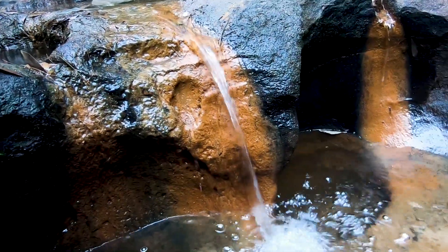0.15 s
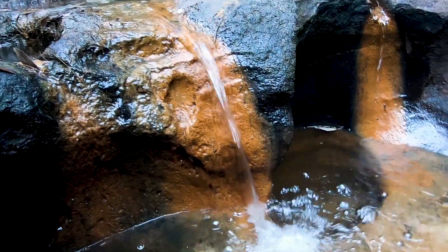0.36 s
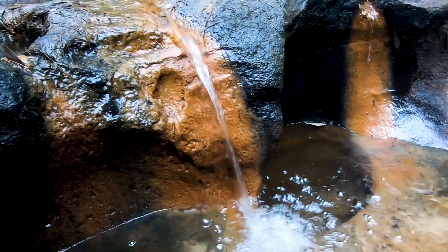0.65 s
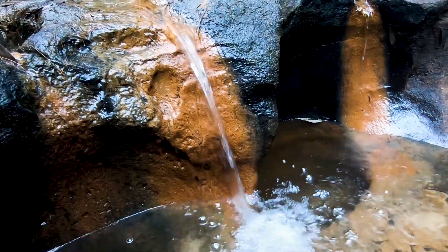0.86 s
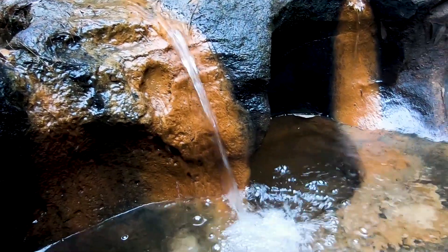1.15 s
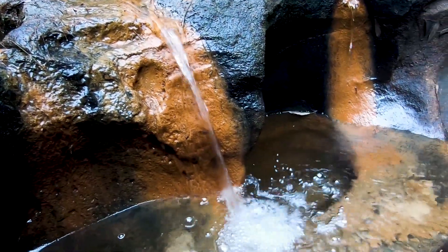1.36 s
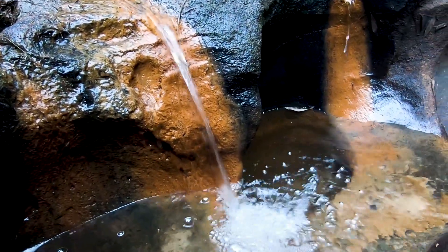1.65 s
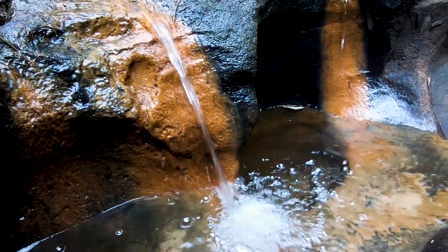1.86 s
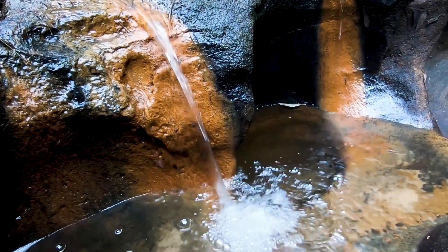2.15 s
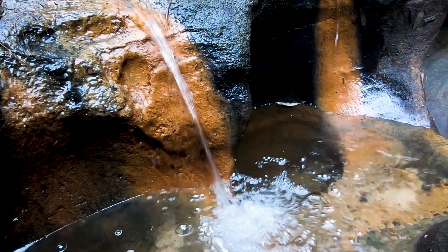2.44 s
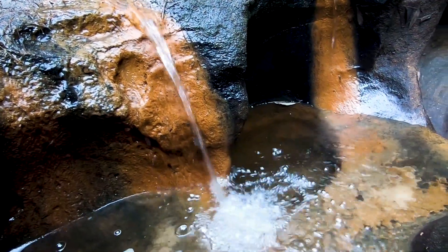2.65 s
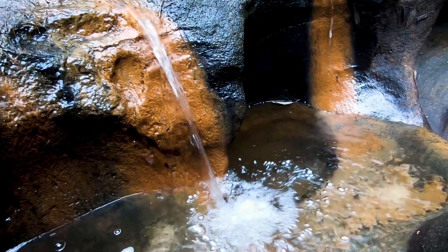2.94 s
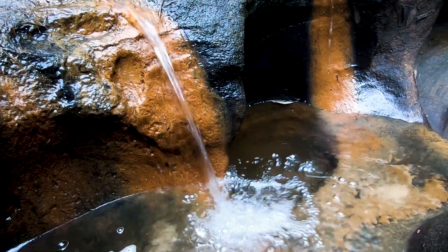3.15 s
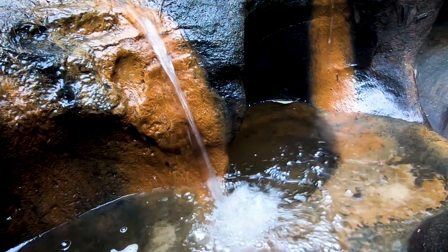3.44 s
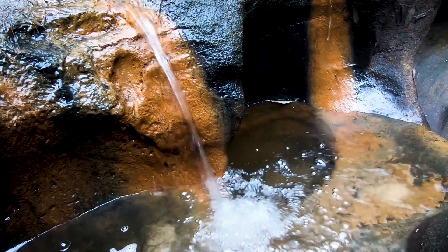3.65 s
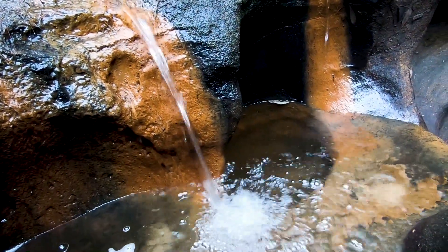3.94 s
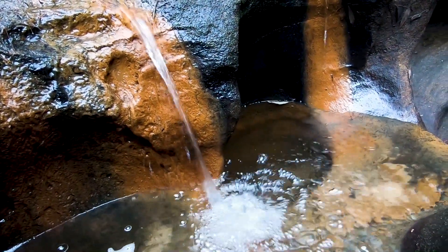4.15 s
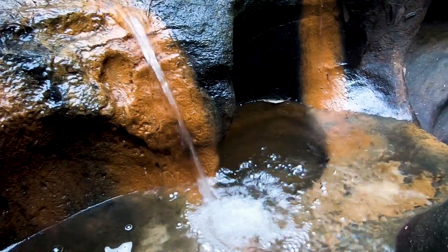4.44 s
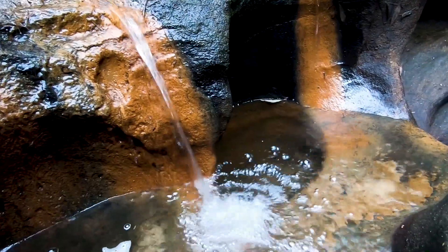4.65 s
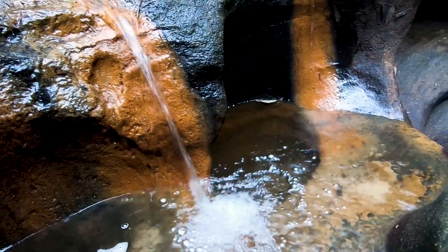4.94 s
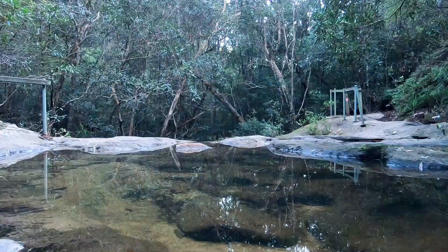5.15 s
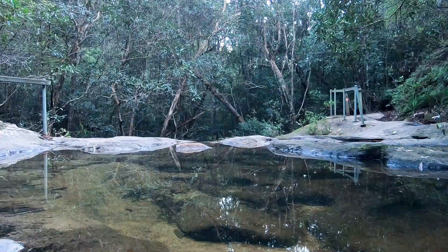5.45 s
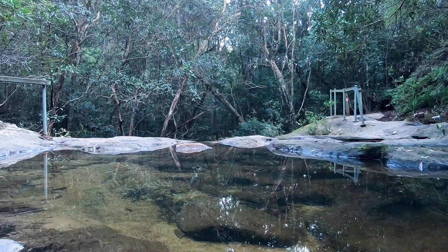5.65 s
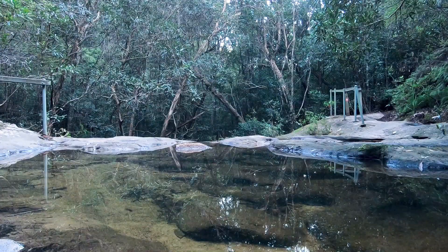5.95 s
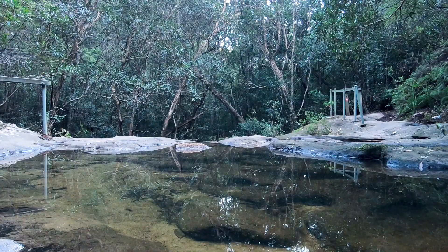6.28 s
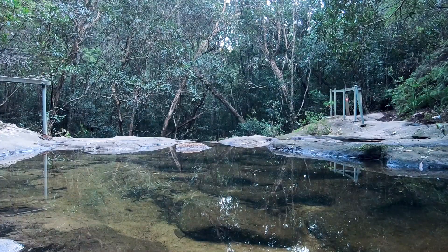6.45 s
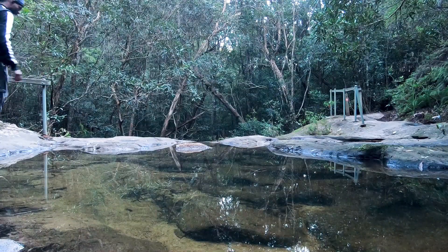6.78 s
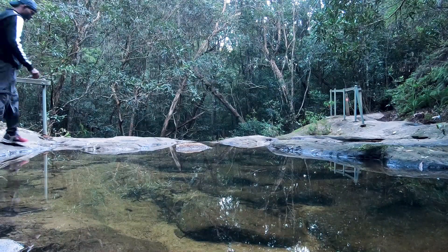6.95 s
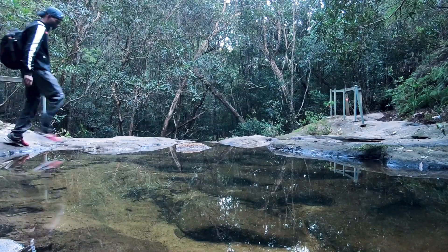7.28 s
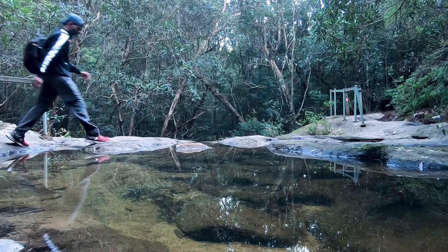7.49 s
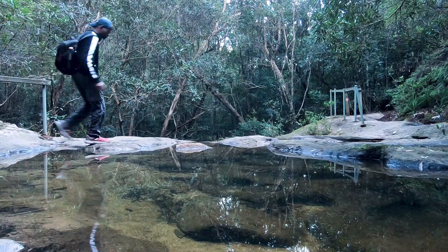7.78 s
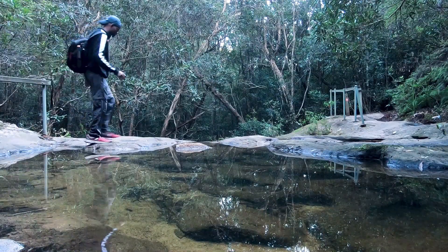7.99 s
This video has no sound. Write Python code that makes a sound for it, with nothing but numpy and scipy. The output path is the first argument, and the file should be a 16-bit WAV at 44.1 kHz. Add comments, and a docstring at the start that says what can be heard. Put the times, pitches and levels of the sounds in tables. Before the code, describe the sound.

A thin stream falls into a small rocky pool, heard close: hollow low gulps, quick bubbling, bright plinking drops and fine fizz. It starts nearly mono and slightly dull, then opens wider and clearer. After about five and a half seconds it drops away to smooth distant water hiss, faint low microphone throbs and a few soft footsteps on rock.

```python
"""A thin stream falls into a small pool in a hollow rock: gulps, spatter and fizz, ringing at fixed pitches.
Bubbles and splashes drive resonances of the hollow; air pockets and drops are short, swelling sines.
The stream fades out, leaving a still pond: far water is shaped noise, the microphone housing rings low as
filtered noise and sine throbs, and soft footsteps are bursts of filtered noise.
The left-right part is almost absent at first, then rises."""
import sys
import numpy as np
from scipy import signal
from scipy.fft import rfft, irfft, next_fast_len
from scipy.io import wavfile

SR = 44100
rng = np.random.default_rng(int(sys.argv[2]) if len(sys.argv) > 2 else 0)


def dump_mix(stems):
    """Bounce the given channels to the path in sys.argv[1] as a 16-bit WAV at rate SR."""
    frames = np.atleast_2d(stems).T  # one column per channel
    limited = np.clip(frames, -1, 1)  # hard clip at full scale
    pcm = np.round(limited * 32767).astype(np.int16)
    wavfile.write(sys.argv[1], SR, pcm)


def voltage_ratio(decibels):
    """Convert decibels (scalar or array-like) to amplitude ratios, 20 dB per decade."""
    exponent = np.asarray(decibels, float) / 20
    return 10 ** exponent


N = 358091
TIME_S = np.arange(N) / SR
POUR_ENDS_S = 5.4   # faint pockets and drops fall before this


def rms_one(x):
    """Scale to rms 1."""
    return x / np.sqrt(np.mean(x ** 2) + 1e-20)


def in_time(rows):
    """Columns of a curve, one value per sample."""
    s, *columns = np.transpose(rows)
    return [np.interp(TIME_S, s, column) for column in columns]


def coloured(x, points):
    """Give a flat signal a spectrum of (f/Hz, level/dB) points; rms 1."""
    size = next_fast_len(N)
    hz, level_db = np.transpose(points)
    log_hz = np.log(np.arange(size // 2 + 1) * SR / size + 1)
    gain = voltage_ratio(np.interp(log_hz, np.log(hz), level_db))
    return rms_one(irfft(rfft(x, size) * gain, size)[:N])


def drift(rate_hz):
    """Slow chance: noise through two one-pole low-passes at rate_hz; rms 1."""
    step = 40   # samples between slow values
    r = np.exp(-2 * np.pi * step * rate_hz / SR)
    noise = rng.standard_normal(N // step + 2002)
    slow = signal.lfilter([1], [1, -2 * r, r * r], noise)[2000:]   # skip the run-in
    return np.interp(np.arange(N) / step, np.arange(len(slow)), rms_one(slow))


def resonance(x, hz, width_hz):
    """A two-pole ring with gain 1 on top."""
    r = np.exp(-np.pi * width_hz / SR)
    poles = [1, -2 * r * np.cos(2 * np.pi * hz / SR), r * r]
    return signal.lfilter([(1 - r * r) / 2, 0, (r * r - 1) / 2], poles, x)


def bubbles(per_s, low_hz, high_hz, cycles, uneven_db, clump_db, clump_rate_hz, count):
    """Bubbles born in clumps, partly shared by all sizes, ring a few cycles at log-spaced pitches."""
    strength = voltage_ratio(uneven_db * np.minimum(rng.exponential(1, N), 4)) * rng.choice([-1, 1], N)
    shared = drift(clump_rate_hz)
    out = np.zeros(N)
    for hz in np.geomspace(low_hz, high_hz, count):
        clump = voltage_ratio(clump_db * (0.35 * shared + drift(clump_rate_hz)))
        born = rng.random(N) < per_s / count * clump / SR
        ring = resonance(strength * born + 1e-18, hz, 1.92 * hz / cycles)
        out += resonance(ring, hz, 0.75 * hz)
    return rms_one(out)


def hollow(x, modes, lag_s):
    """Parallel rings of the rock; their left-right part takes another path and arrives a little later."""
    mid, side = np.zeros(N), np.zeros(N)
    for k, (hz, width_hz, level_db, side_db) in enumerate(modes):
        ring = (-1) ** k * voltage_ratio(level_db) * resonance(x, hz, width_hz)   # alternate signs
        mid += ring
        side += voltage_ratio(side_db) * ring
    return np.array([mid, np.roll(side, round(lag_s * SR))])


def add_swelling_sine(out, s, hz, peak_db, t60, rise, attack_cycles):
    """A sine that swells and dies, its pitch climbing by twice the rise share over t60, as a bubble surfaces."""
    start = round(s * SR)
    t = np.arange(round(t60 * SR))[:N - start] / SR
    swell = (1 - np.exp(-t * hz / attack_cycles)) ** 2
    envelope = swell * voltage_ratio(peak_db - 60 * t / t60)
    out[start:start + len(t)] += envelope * np.sin(2 * np.pi * hz * t * (1 + rise * t / t60))


# Strength of the pour, before each layer's own gain:
# (t/s, deep gurgle level/dB, middle gurgle level/dB, spatter level/dB)
POUR_LEVELS = [(0.0, -45, -43.5, -41), (0.8, -41, -46, -40), (1.7, -46, -44, -42), (2.2, -47, -50, -42.5),
               (3.5, -46.5, -49.5, -41.5), (5.07, -49, -52, -43), (5.4, -55.5, -55.5, -50),
               (5.62, -59, -68, -57)]
# Deep rings of the hollow: (f/Hz, width/Hz, level/dB, left-right level/dB re the ring)
DEEP_RINGS = [(156.6, 27.4, -2.5, -46), (184, 24, 0.5, -61), (224, 30.4, -12, -42)]
# Middle rings of the hollow: (f/Hz, width/Hz, level/dB, left-right level/dB re the ring)
MIDDLE_RINGS = [(308, 15, -21, -34), (398, 17.8, -6.5, -39), (441, 27.6, -11, -25), (539, 115, -19.5, -8.5)]


def gurgle():
    """Large bubbles stir the deep and middle rings of the hollow."""
    deep_db, middle_db, _ = in_time(POUR_LEVELS)
    large = bubbles(260, 117.0, 584, cycles=3.8, uneven_db=3.0, clump_db=4.5, clump_rate_hz=9.0, count=8)
    deep = voltage_ratio(deep_db + 16.0) * hollow(large, DEEP_RINGS, lag_s=0.009)
    later = np.roll(large, SR)   # one second apart, so the two bands do not move together
    middle = voltage_ratio(middle_db + 18.5) * hollow(later, MIDDLE_RINGS, lag_s=0.0091)
    return deep + middle


# Bright rings of the hollow: (f/Hz, width/Hz, level/dB, left-right level/dB re the ring)
BRIGHT_RINGS = [(700, 31.4, 2, -8), (773, 32, -1, 1.5), (932, 70, -8.5, -9), (1051, 41, -2.5, -20),
                (1300, 214, -6, -2), (1616, 45, -1, -9), (1800, 135, -4.5, 1), (2102, 34, -1, -12),
                (2330, 88, 0, -1.5), (2464, 33, -1, -17), (2632, 100, -6.5, -16), (2900, 48, 0.5, -26),
                (3050, 54, -2, -4), (3297, 92, 0, -19), (3590, 530, -10, -34), (4800, 860, -17.5, -18)]
# A broad ring in the spatter, heard only at first:
# f/Hz, width/Hz, level/dB re the spatter, full until t/s, fade length/s
EARLY_BROAD_RING = (1200, 350, -4, 1.0, 0.1)


def spatter():
    """Small bubbles stir the bright rings, and are heard past the hollow in the left-right part."""
    spatter_db = in_time(POUR_LEVELS)[2]
    small = bubbles(3600, 494, 5650, cycles=11.7, uneven_db=4.5, clump_db=4.5, clump_rate_hz=9.0, count=16)
    sound = voltage_ratio(spatter_db + 8.5) * hollow(small, BRIGHT_RINGS, lag_s=0.006)
    hz, width_hz, early_db, until_s, fade_s = EARLY_BROAD_RING
    early_fade = np.clip((until_s - TIME_S) / fade_s + 1, 0, 1)
    sound[0] += voltage_ratio(spatter_db + early_db) * resonance(small, hz, width_hz) * early_fade
    sound[1] += voltage_ratio(spatter_db - 16) * np.roll(small, 500)
    return sound


# Spectrum of fine droplets: (f/Hz, relative level/dB per Hz)
SPRAY_SPECTRUM = [(1940, -56), (3300, -16), (3730, -1), (4280, 2), (5470, -3.5), (8780, -6.5),
                  (10800, -22.5), (12300, -20.5), (15500, -51)]
# Strength of the fizzing droplets: (t/s, level/dB)
SPRAY_LEVELS = [(0, -50.5), (1, -54), (1.6, -50), (2.5, -51.5), (3.5, -50), (4.5, -48), (5.1, -52),
                (5.5, -58)]


def spray():
    """Droplets fizz above the spatter: the tiniest bubbles, shaped to the spray spectrum."""
    droplets = bubbles(6000, 4000, 14000, cycles=5.6, uneven_db=7.0, clump_db=4.0, clump_rate_hz=20.0, count=6)
    fizz = voltage_ratio(in_time(SPRAY_LEVELS)[0]) * coloured(droplets, SPRAY_SPECTRUM)
    return np.array([fizz, voltage_ratio(2.0) * np.roll(fizz, 310)])


# Spectrum of the low rumble: (f/Hz, relative level/dB per Hz)
RUMBLE_SPECTRUM = [(20, -43), (50, 14), (100, 16), (140, -22), (300, -13)]


def rumble():
    """The falling water beats on the pool: low noise that follows the deep gurgle, in the middle."""
    deep_db = in_time(POUR_LEVELS)[0]
    low = voltage_ratio(deep_db - 24.0) * coloured(rng.standard_normal(N), RUMBLE_SPECTRUM)
    return np.array([low, np.zeros(N)])


# Far water: (t/s, hiss level/dB rms, left-right level/dB rms)
FAR_LEVELS = [(0, -51, -130), (.79, -50.5, -130), (.84, -50, -60), (1.2, -52, -53), (1.8, -48, -50),
              (2.5, -45, -47.5), (4, -45.5, -47.5), (5.1, -45, -48), (5.5, -46.5, -50), (6.5, -46.5, -50),
              (8.12, -47, -50)]
# Spectrum of the hiss: (f/Hz, relative level/dB)
HISS_SPECTRUM = [(15, -60), (25, -23), (119, -28.5), (174, -5), (253, -12), (400, -15.5), (700, -15),
                 (1050, -17.5), (1300, -14), (2300, -10.5), (3100, -6), (4000, -7.5), (6400, -9),
                 (8300, -11), (9000, -11), (11200, -33), (12200, -32.5), (15600, -41)]
# Spectrum of its left-right part: (f/Hz, relative level/dB)
SPREAD_SPECTRUM = [(15, -50), (25, -22), (96, -14), (152, -8.5), (260, -11), (411, -7), (520, -8.5),
                   (1300, -5.5), (2600, -3), (3900, -8.5), (5200, 0), (8600, 3.5), (11300, -17),
                   (12300, -22), (15600, -26)]


def far_water():
    """Smooth, slightly unsteady hiss with an unrelated left-right part, over the low ring of the housing."""
    hiss_db, spread_db = in_time(FAR_LEVELS)
    hiss = voltage_ratio(hiss_db + 0.5 * drift(10.4)) * coloured(rng.standard_normal(N), HISS_SPECTRUM)
    side = voltage_ratio(spread_db + 0.5 * drift(7.0)) * coloured(rng.standard_normal(N), SPREAD_SPECTRUM)
    mid = hiss + low_throbs()
    side += 0.058 * mid * (hiss_db > -50)   # the louder hiss and the throbs lie a little to the left
    return np.array([mid + housing_hum(), side])


# Low ring of the microphone housing, still faintly heard after the pour: f/Hz, width/Hz
HOUSING_RING = (174.2, 39)


def housing_hum():
    """Noise through two resonances at one pitch; its level wavers by chance."""
    hz, width_hz = HOUSING_RING
    hum = resonance(resonance(rng.standard_normal(N), hz, width_hz), hz, 1.35 * width_hz)
    return voltage_ratio(-64.5 + 4.5 * drift(7.6)) * rms_one(hum)   # mean level dB, waver dB, waver rate Hz


# Soft throbs at the pitch of the housing: (t/s, level/dB before the swell)
THROBS = [(6.09, -44.5), (6.23, -52), (6.37, -48), (7.271, -43), (7.455, -46), (7.82, -52), (7.999, -51)]


def low_throbs():
    """Steady-pitched sines that swell and die away."""
    out = np.zeros(N)
    for s, peak_db in THROBS:
        add_swelling_sine(out, s, HOUSING_RING[0], peak_db, t60=0.23, rise=0, attack_cycles=0.64)
    return out


# Faint pockets, one row per size:
# (count, rounded down, mean level/dB, spread/dB, mean f/Hz, spread/Hz, t60/s)
FAINT_POCKET_SIZES = [(21.86, -33, 3, 174.7, 9.7, 0.12), (22, -34, -0.5, 408, 8.9, 0.073)]


def faint_pockets():
    """Rows like the loud pockets, scattered by chance over the pour."""
    rows = []
    for count, peak_db, spread_db, hz, spread_hz, t60 in FAINT_POCKET_SIZES:
        for _ in range(int(count)):
            s = POUR_ENDS_S * rng.random()
            loud, pitch = rng.standard_normal(2)
            rows.append((s, peak_db + spread_db * loud, hz + spread_hz * pitch, t60))
    return rows


# The loudest air pockets dragged under, large near 180 Hz and middling near 410 Hz:
# (t/s, level/dB before the swell, starting f/Hz, t60/s)
LOUD_POCKETS = [(0.042, -17, 174, 0.11), (0.076, -26.5, 412, 0.055), (0.181, -28, 163, 0.14),
                (0.294, -29, 167.5, 0.16), (0.336, -29, 436, 0.058), (0.353, -23, 190, 0.072),
                (0.439, -18, 181, 0.064), (0.455, -25.5, 420, 0.08), (0.503, -17, 171, 0.097),
                (0.677, -19, 189.5, 0.17), (0.681, -27, 387.5, 0.44), (0.762, -23, 428, 0.14),
                (0.838, -20.5, 181, 0.12), (0.839, -26, 423, 0.09), (1.271, -20, 393, 0.037),
                (1.271, -11, 181, 0.074), (1.445, -29.5, 187, 0.12), (1.534, -29, 422, 0.046),
                (1.618, -18.5, 176, 0.21), (1.713, -19, 197, 0.08), (2.074, -25, 165, 0.1),
                (2.315, -29.5, 383, 0.077), (2.458, -27.5, 189, 0.17), (2.485, -32, 423, 0.12),
                (2.626, -22, 184.4, 0.17), (2.902, -24, 170, 0.19), (2.933, -30, 405, 0.068),
                (3.21, -27.5, 419, 0.076), (3.209, -25.5, 188, 0.08), (3.351, -26, 181, 0.092),
                (3.396, -26, 154, 0.076), (3.706, -27.5, 171, 0.26), (4.058, -21, 170, 0.079),
                (4.138, -25.5, 175, 0.12), (4.136, -35.5, 405, 0.12), (4.26, -33, 398, 0.071),
                (4.32, -23.5, 173, 0.11), (4.577, -25, 170, 0.07), (5.168, -22.5, 169, 0.072),
                (5.277, -27.5, 180, 0.12), (5.379, -36, 416, 0.091)]
# How a pocket climbs and swells, by its pitch: (f/Hz, rise share, swell/cycles)
POCKET_MOTION = [(180, 0.017, 0.62), (410, 0.1, 0.44)]


def air_pockets():
    """Each gulp of air rings free as a swelling, climbing sine."""
    out = np.zeros(N)
    size_hz, rise, swell_cycles = np.transpose(POCKET_MOTION)
    for s, peak_db, hz, t60 in LOUD_POCKETS + faint_pockets():
        add_swelling_sine(out, s, hz, peak_db, max(t60, 0.02),
                          np.interp(hz, size_hz, rise), np.interp(hz, size_hz, swell_cycles))
    # the microphone picks up little bass below about 105 Hz
    high_pass = signal.butter(2, 105, "high", fs=SR, output="sos")
    return np.array([signal.sosfilt(high_pass, out + 1e-18), np.zeros(N)])


def faint_drops():
    """Rows like the loud drops, scattered by chance, each at the pitch of one bright ring."""
    count, pitch_db, splash_db, spread_db = 80, -32, -42, 2.5
    when, ring = rng.random((count, 2)).T
    loud, wet = spread_db * rng.standard_normal((count, 2)).T
    hz = np.array(BRIGHT_RINGS)[(ring * len(BRIGHT_RINGS)).astype(int), 0]
    return list(zip(POUR_ENDS_S * when, pitch_db + loud, hz, splash_db + wet))


# Single drops and bubbles that stand out, before swell and layer gains:
# (t/s, pitch level/dB, starting f/Hz, splash level/dB)
LOUD_DROPS = [(0.253, -26.5, 2430, -48), (0.34, -24, 700, -42), (0.45, -18.5, 790, -38),
              (0.684, -25, 2330, -36), (0.766, -26, 2280, -34), (0.978, -26, 2930, -31),
              (1.0, -25, 1690, -38), (1.212, -16.5, 2410, -33), (1.271, -18.5, 720, -46),
              (1.316, -21.5, 3230, -49), (1.617, -18.5, 4500, -39), (1.971, -22, 2380, -37),
              (2.224, -25, 2300, -34), (2.389, -26, 3300, -39), (2.631, -24, 2430, -33),
              (2.669, -22, 2830, -32), (2.726, -26, 3070, -33.5), (2.977, -22.5, 2320, -28),
              (3.1, -23, 2380, -33), (3.212, -17, 2070, -36.5), (3.261, -21, 3180, -29.5),
              (3.521, -20, 816, -44), (3.581, -22.5, 2800, -35), (3.687, -24.5, 1090, -47),
              (3.725, -24, 730, -32.5), (3.761, -21, 4020, -30), (3.86, -25, 2730, -35),
              (3.914, -19, 2810, -46), (4.053, -25, 3050, -28), (4.092, -21.5, 2620, -43),
              (4.135, -22, 750, -46), (4.567, -25.5, 2330, -35), (4.758, -23, 3430, -40),
              (4.854, -24.5, 2490, -34), (5.06, -31, 2900, -29), (5.28, -38, 2400, -31)]


def drops():
    """Each drop is a short pitch and a burst of splash that set the bright rings going."""
    plinks, hits = np.zeros(N), np.zeros(N)
    for s, peak_db, hz, splash_db in LOUD_DROPS + faint_drops():
        add_swelling_sine(plinks, s, hz, peak_db, t60=0.014, rise=0.12, attack_cycles=0.61)
        hits[round(s * SR)] = voltage_ratio(splash_db)
    fall = np.exp(-1 / (0.0073 * SR))     # time constants in s
    swell = np.exp(-1 / (0.00096 * SR))
    burst = signal.lfilter([1], [1, -fall], hits)
    burst = signal.lfilter([1 - swell], [1, -swell], burst)
    splash = burst * rms_one(resonance(rng.standard_normal(N), 2270, 3200))
    # the fine spray thrown up by each drop
    ticks = coloured(burst * rng.standard_normal(N), SPRAY_SPECTRUM) * np.std(burst)
    rung = voltage_ratio(6.0) * hollow(plinks + splash + 1e-18, BRIGHT_RINGS, lag_s=0.004)
    direct = voltage_ratio(-9) * plinks + voltage_ratio(-7.5) * ticks
    return rung + np.array([direct, voltage_ratio(-16) * np.roll(direct, 90)])


# Gain of the pour's left-right part: (t/s, gain/dB)
POUR_SIDE_GAIN = [(0, -44), (.8, -26), (1.0, -28), (1.6, -12), (2.5, -7), (5.6, -6)]


def pour():
    """The whole stream as mid and side: its left-right part is almost absent, then rises; then all fades."""
    sound = gurgle() + spatter() + spray() + rumble() + air_pockets() + drops()
    sound[1] *= voltage_ratio(in_time(POUR_SIDE_GAIN)[0])
    return sound * np.clip((5.66 - TIME_S) / 0.12, 0, 1)   # silent from 5.66 s, after a 0.12 s fade


# Shoes on rock, before a common gain: (t/s, level/dB, centre f/Hz, width/Hz, length/s)
SHOE_CONTACTS = [(6.036, -49.5, 500, 900, 0.054), (6.077, -48, 1670, 1200, 0.086),
                 (6.038, -48.5, 260, 150, 0.03), (6.347, -48.5, 298, 180, 0.035),
                 (6.545, -50.5, 330, 250, 0.027), (6.549, -43.5, 700, 1300, 0.011),
                 (6.577, -51.5, 1500, 800, 0.087), (6.898, -48, 1500, 1100, 0.099),
                 (7.003, -54, 2900, 120, 0.06), (7.112, -49, 2500, 3000, 0.16),
                 (7.189, -45, 1580, 1300, 0.067), (7.196, -46, 4070, 1800, 0.067),
                 (7.621, -47, 800, 700, 0.016), (7.678, -44.5, 1300, 1200, 0.028),
                 (7.733, -49, 340, 300, 0.06)]


def footsteps():
    """Each contact is a short gritty burst of band-limited noise, quick to start."""
    out = np.zeros((2, N))
    t = np.arange(4000) / SR
    for s, level_db, hz, width_hz, length in SHOE_CONTACTS:
        noise = rng.standard_normal((2, len(t)))
        grit = rms_one(resonance(resonance(noise, hz, width_hz), hz, 2 * width_hz))
        envelope = (1 - np.exp(-t / (0.11 * length))) * np.exp(-2.5 * t / length)
        start = round(s * SR)
        out[:, start:start + len(t)] += grit * voltage_ratio(level_db + 4) * envelope
    return out * voltage_ratio([[0], [-8]])   # mid, side


def scene():
    """Mid and side of all sources, turned into left and right."""
    mid, side = pour() + far_water() + footsteps()
    return np.array([mid + side, mid - side])


# The middle treble is dulled at first: (t/s, share removed 0-1)
TREBLE_DULLING = [(0, 0.65), (1.1, 0.46), (1.7, 0), (8.12, .001)]


def dull_treble(sound):
    """Subtracting a broad resonance leaves a dip near 7 kHz that soon fills in."""
    share = np.clip(in_time(TREBLE_DULLING)[0], 0, 1)
    return sound - share * resonance(sound, 7040, 3900)


def top_cut(x):
    """Nothing passes above the cut-off."""
    return signal.sosfilt(signal.butter(12, 15690, fs=SR, output="sos"), x)


def record(dry):
    """Finish the mix with its early treble dip."""
    mix = dull_treble(dry)
    return top_cut(mix)


dry = scene()
out = record(dry)
dump_mix(out)
```